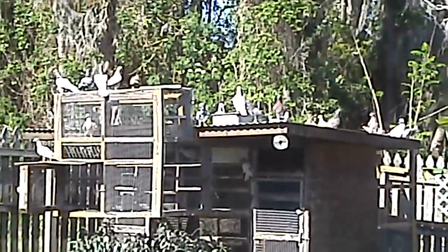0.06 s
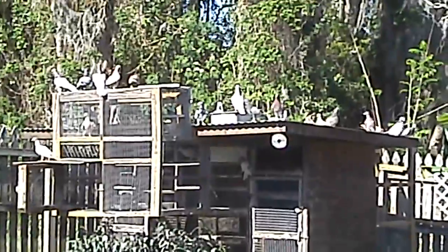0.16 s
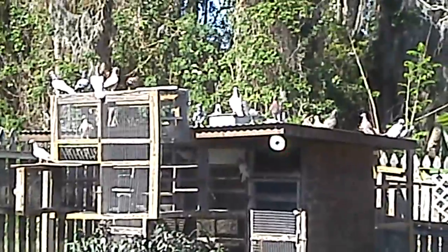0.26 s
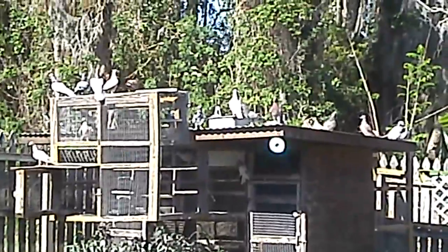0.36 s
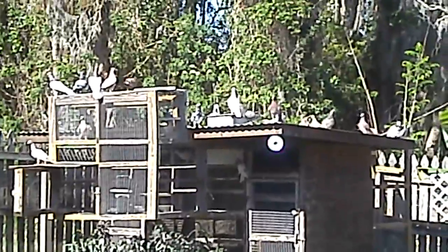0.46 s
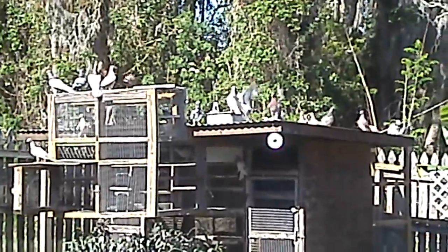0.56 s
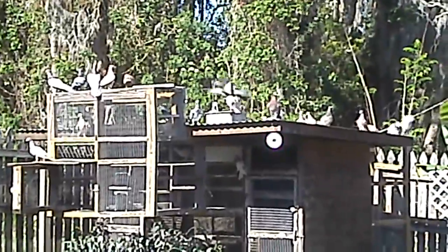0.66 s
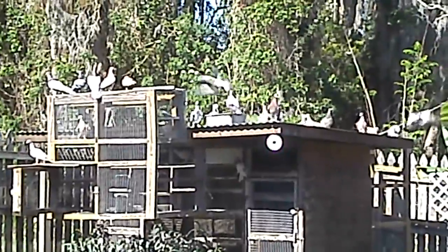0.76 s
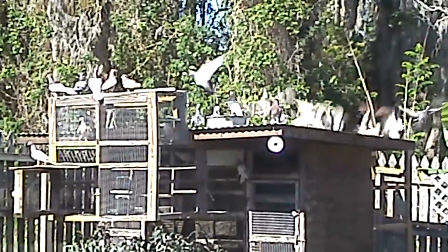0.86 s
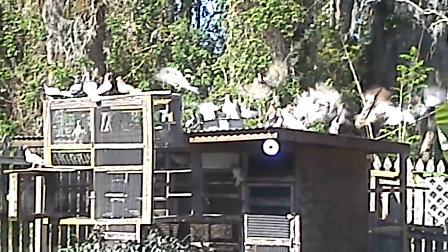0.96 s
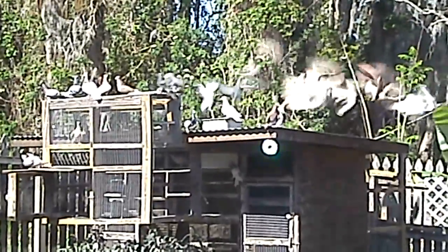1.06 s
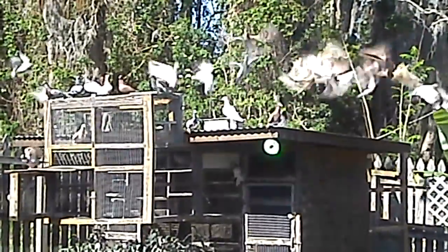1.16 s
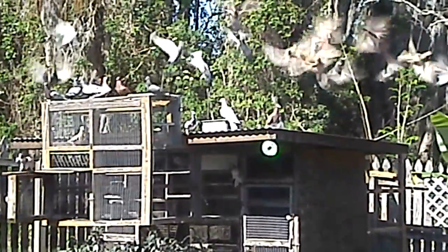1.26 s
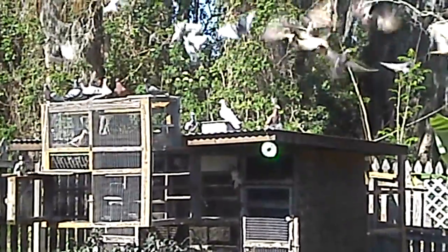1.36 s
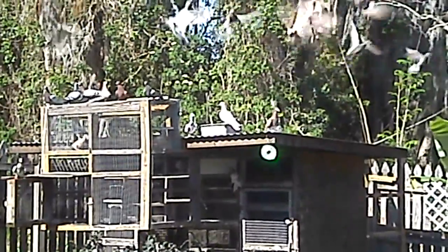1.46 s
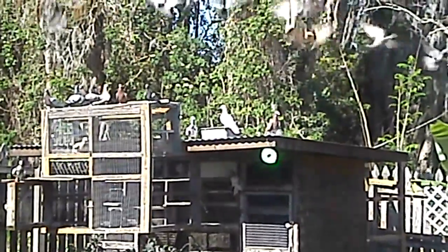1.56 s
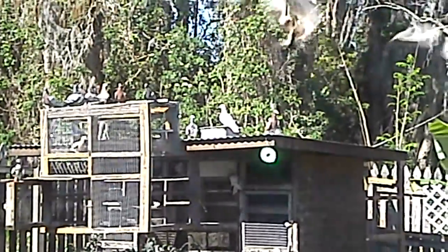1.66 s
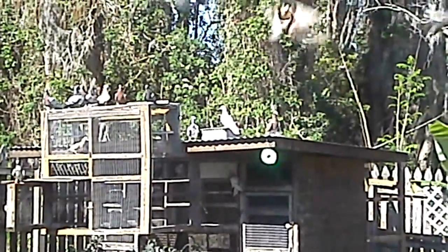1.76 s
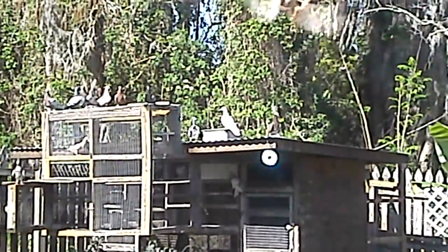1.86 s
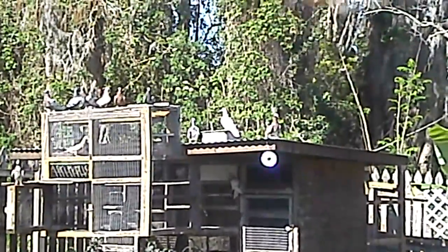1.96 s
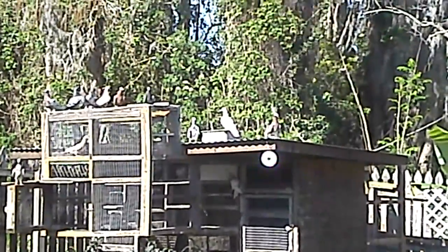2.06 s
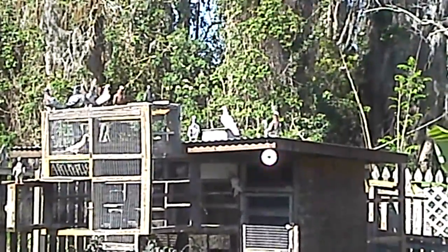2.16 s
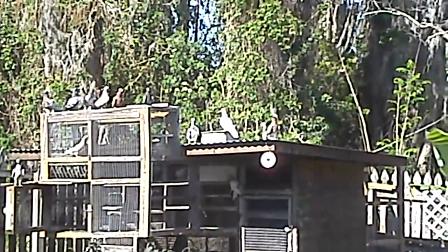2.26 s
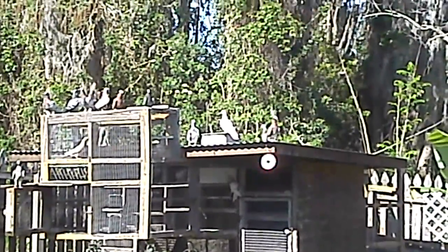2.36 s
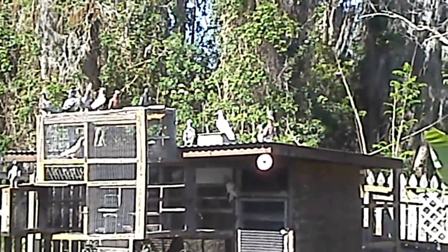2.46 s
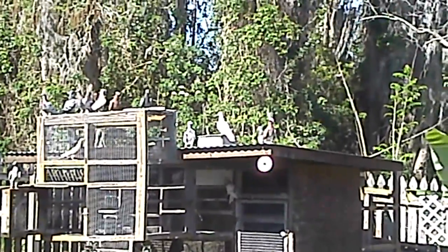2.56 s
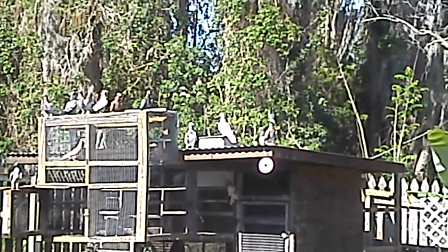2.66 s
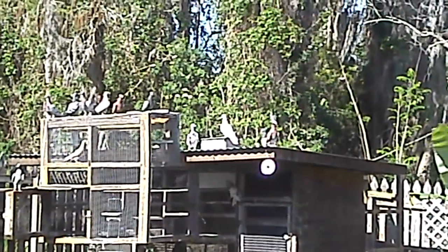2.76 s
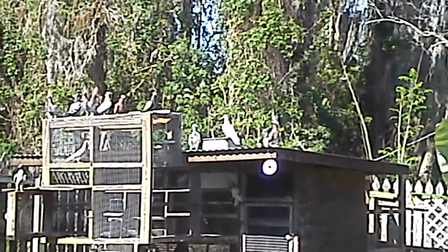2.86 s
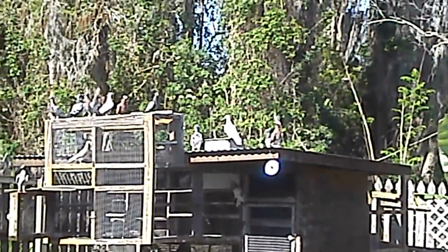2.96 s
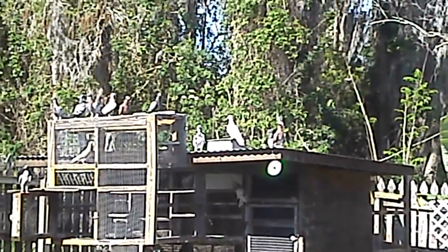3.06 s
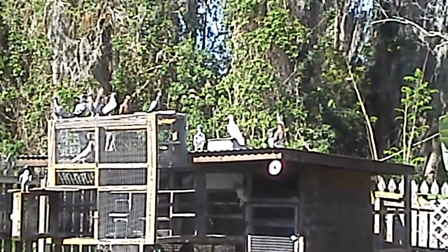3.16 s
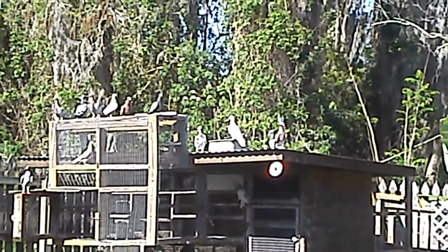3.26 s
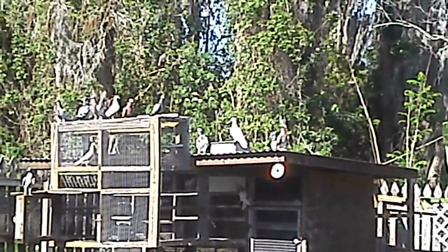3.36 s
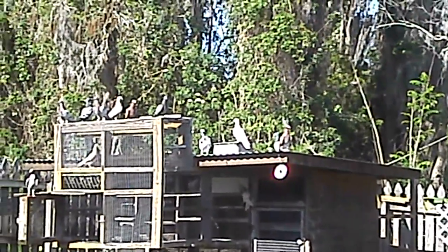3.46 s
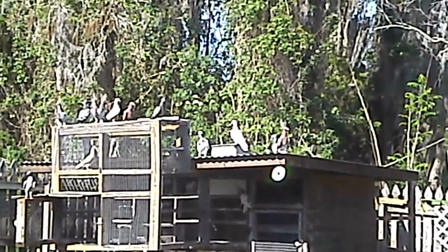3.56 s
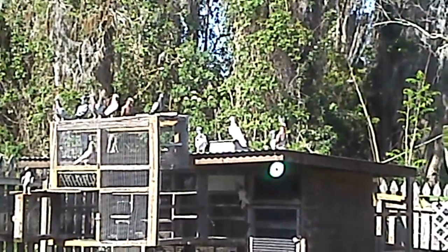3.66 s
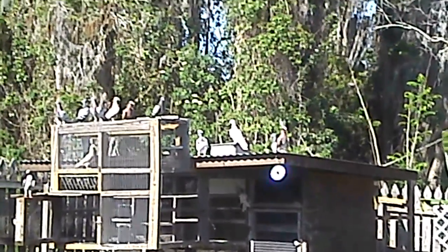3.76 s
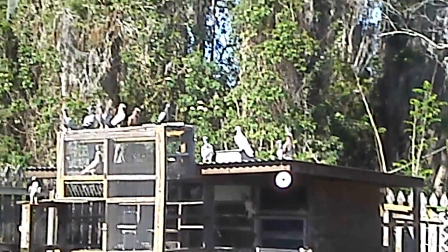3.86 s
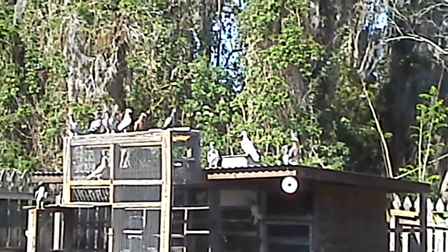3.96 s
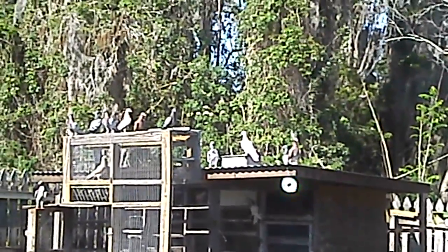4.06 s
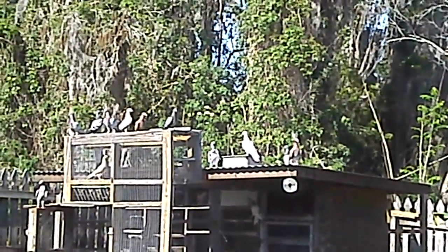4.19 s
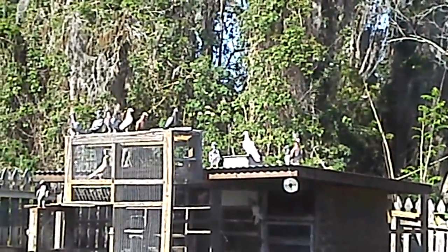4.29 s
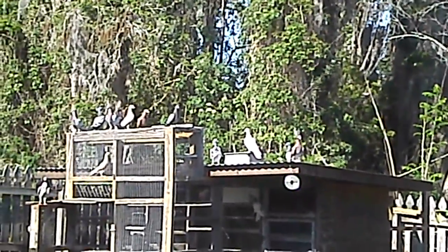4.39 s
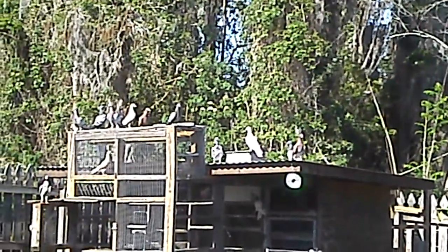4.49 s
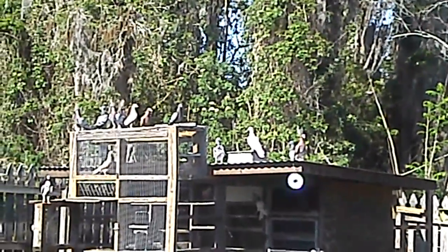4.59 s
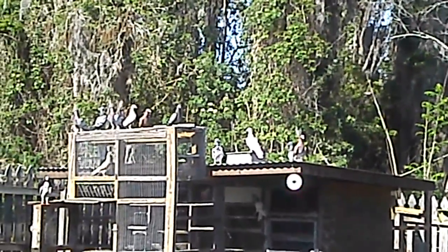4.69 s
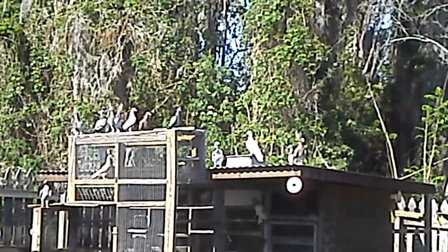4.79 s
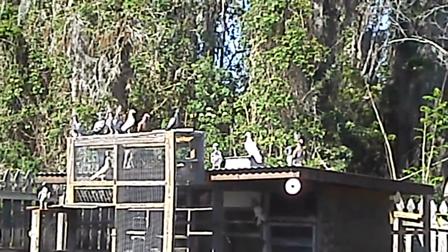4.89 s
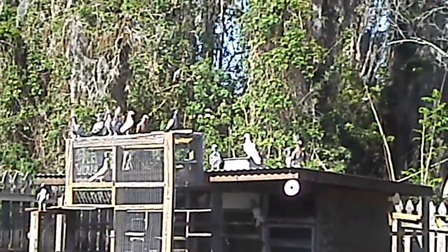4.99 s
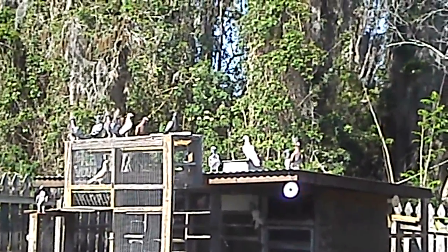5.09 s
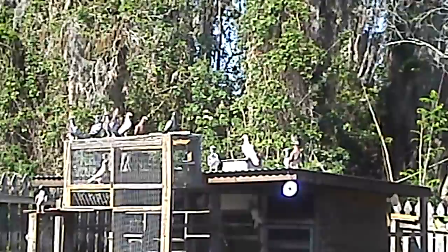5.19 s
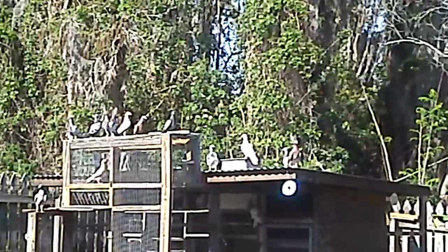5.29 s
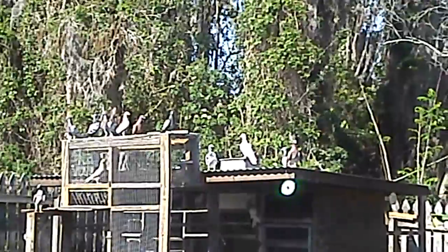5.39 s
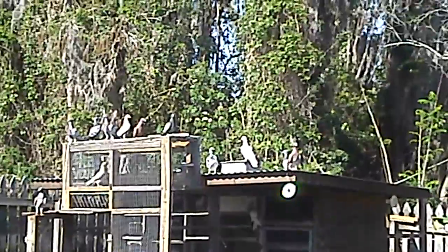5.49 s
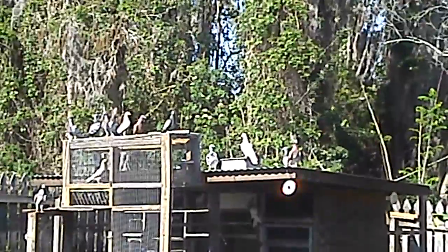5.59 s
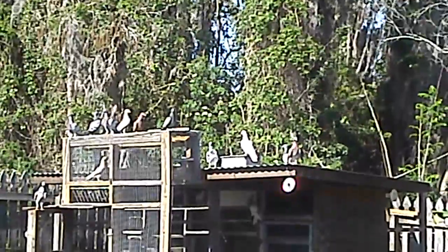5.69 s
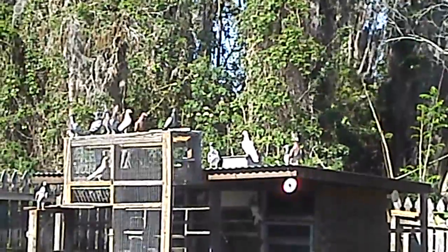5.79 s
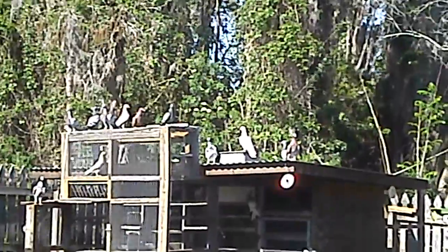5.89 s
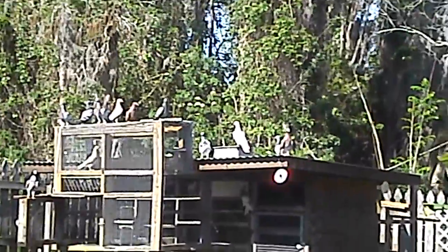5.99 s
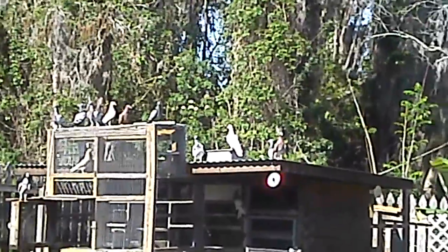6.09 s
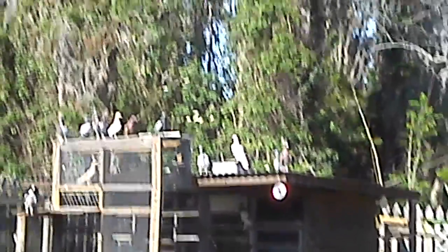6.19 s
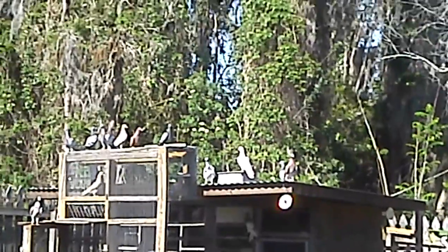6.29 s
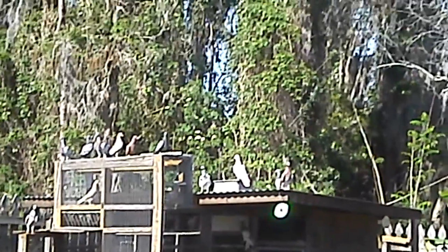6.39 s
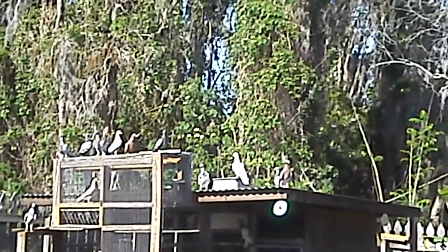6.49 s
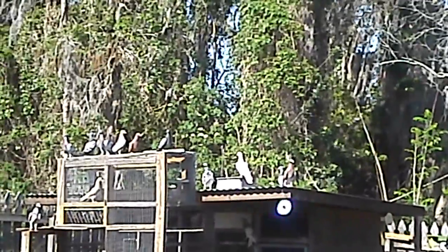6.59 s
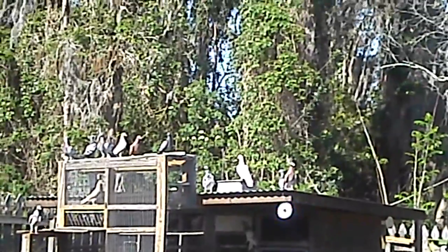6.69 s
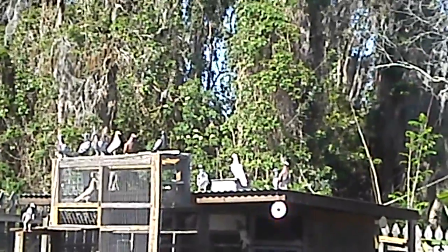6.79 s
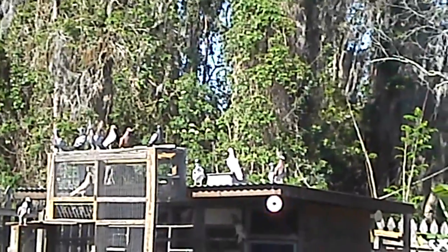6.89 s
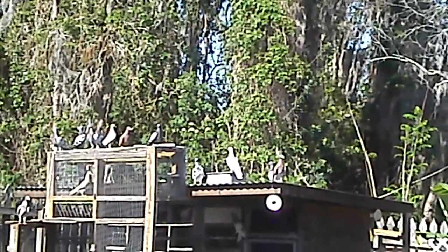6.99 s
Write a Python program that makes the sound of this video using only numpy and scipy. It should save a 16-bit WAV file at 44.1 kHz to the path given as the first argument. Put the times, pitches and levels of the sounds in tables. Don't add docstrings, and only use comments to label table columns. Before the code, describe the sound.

Pigeons explode into flight with dense, feathery flapping and sharp claps that swell, peak and stop, then faint whistling wingbeats over leaves and a distant engine.

```python
import sys
import numpy as np
from scipy import signal
from scipy.fft import rfft, irfft
from scipy.io import wavfile
from scipy.ndimage import uniform_filter1d

SR = 44100
rng = np.random.default_rng(int(sys.argv[2]) if len(sys.argv) > 2 else 0)


def elevation(decibels):
    levels = np.asarray(decibels, float)
    return 10 ** (levels / 20)


def unload_wav(signal):
    wavfile.write(
        sys.argv[1],
        SR,
        np.round(np.clip(np.atleast_2d(signal).T, -1, 1) * 32767).astype(np.int16),
    )


N = 310464


def over_time(points_s, values):
    return np.interp(np.arange(N) / SR, points_s, values)


def in_time(rows):
    s, *columns = np.transpose(rows)
    return [over_time(s, column) for column in columns]


def rms_one(x):
    return x / np.sqrt(np.mean(x ** 2) + 1e-20)


def band(x, low_hz, high_hz):
    return signal.sosfilt(signal.butter(2, [low_hz, high_hz], "band", fs=SR, output="sos"), x)


def coloured(spectrum, x):
    hz, db = np.transpose(spectrum)
    bin_hz = np.fft.rfftfreq(N, 1 / SR) + 1
    gain_db = np.interp(np.log(bin_hz), np.log(hz), db)
    return rms_one(irfft(rfft(x) * elevation(gain_db), N))


def drift(rate_hz):
    r = np.exp(-2 * np.pi * rate_hz / SR)
    wander = signal.lfilter([1], [1, -2 * r, r * r], rng.standard_normal(N + SR))
    return rms_one(wander[SR:])


def add(out, piece, start_s):
    at = max(round(start_s * SR), 0)
    out[at:at + len(piece)] += piece[:N - at]


# frequency in Hz, density in dB per Hz.
AIR_SPECTRUM = [(30, -5.5), (110, -3), (200, -8.5), (400, -2), (800, -5), (1300, -8.5), (2500, -11.5),
                (5000, -18)]
# middle in seconds, level in dB, half length in seconds.
GUSTS = [
    (0.0, -43.5, 0.26),
    (3.821, -46.5, 0.36),
]


def garden(rest_db=-47.5, stirred_db=-45, rustle_db=-3.0):
    t = np.arange(N) / SR
    rustle = elevation(rest_db) + elevation(stirred_db) * over_time([1.06, 1.12, 3.33, 3.42], [0, 1, 1, 0])
    for s, db, half_s in GUSTS:
        rustle = rustle + elevation(db) * np.clip(1 - np.abs(t - s) / half_s, 0, 1)
    return rustle * elevation(rustle_db + 2.2 * drift(9.5)) * coloured(AIR_SPECTRUM, rng.standard_normal(N))


# time in seconds, cycle rate in Hz, level in dB.
ENGINE_RUN = [(0.0, 28.1, -62.5), (0.45, 28.09, -62.5), (0.65, 28.3, -70), (0.92, 28.64, -56.5),
              (1.51, 30.21, -59.5), (2.21, 31.46, -52), (3.18, 32.85, -57.5), (3.92, 33.25, -59),
              (5.22, 33.6, -59.5), (5.94, 31.69, -66), (7.04, 30.13, -67.5)]
# multiple of the cycle rate, level in dB.
ENGINE_ORDERS = [(5, -2.5), (6, -5), (7, -8), (8, -1.5)]


def engine(waver=.002, throb_db=2.5, pipe_hz=318.2, pipe_width_hz=48):
    rate_hz, load_db = in_time(ENGINE_RUN)
    phase = 2 * np.pi * np.cumsum(rate_hz * (1 + waver * drift(3))) / SR
    levels = {round(k): elevation(load_db + db) for k, db in ENGINE_ORDERS}
    for k in (9, 10, 11):
        detune = 2 * (k * rate_hz - pipe_hz) / pipe_width_hz
        levels[k] = elevation(load_db + 3.0) / (1 + detune ** 2)
    out = np.zeros(N)
    for k, gain in levels.items():
        out += np.sqrt(2) * gain * elevation(throb_db * drift(3.6)) * np.sin(k * phase + k * k)
    return out


# middle in seconds, level in dB, pitch in Hz, length in ms.
COO_PUFFS = [(.01, -31, 372, 21), (0.034, -29.5, 477, 20), (0.061, -28, 346, 24), (0.083, -36, 432, 33),
             (0.116, -25.5, 395, 24), (.137, -36.5, 388, 18), (0.158, -26, 401, 26), (.182, -24.5, 360, 26),
             (0.2, -32, 367, 16), (0.221, -34, 413.4, 24), (3.64, -35.5, 416, 26), (4.6, -41, 307, 40),
             (4.867, -38, 324, 30), (4.985, -45, 312.4, 26), (5.015, -40, 301.5, 30),
             (5.108, -46.5, 286, 24), (5.135, -38, 286, 30), (5.201, -42.5, 297, 34),
             (5.41, -42.5, 305.7, 60), (6.235, -50, 294, 50)]
# time in seconds, pitch in Hz, level in dB.
HELD_COO = [
    (0.28, 437, -40.5),
    (0.312, 357, -39),
    (0.418, 372.4, -35),
    (0.44, 362, -27),
    (0.456, 330, -36.5),
    (0.488, 321, -41.5),
    (0.53, 319, -53),
]


def coo(second_db=-23.5, throb_db=5.5, breath_db=-9.5, hiss_db=-17.5):
    pitch_hz, db = in_time(HELD_COO)
    gate = over_time([.27, .29, .51, .54], [0, 1, 1, 0])
    effort = elevation(db + 1.0 + throb_db * drift(50)) * gate
    phase = 2 * np.pi * np.cumsum(pitch_hz * (1 + 0.017 * drift(40))) / SR
    voice = effort * (np.sin(phase) + elevation(second_db) * np.sin(2 * phase))
    for s, puff_db, hz, ms in COO_PUFFS:
        t = np.arange(round(ms / 1000 * SR)) / SR
        puff = elevation(puff_db) * np.hanning(len(t))
        add(voice, puff * np.sin(2 * np.pi * hz * t), s - ms / 2000)
        add(effort, puff, s - ms / 2000)
    breath = elevation(breath_db) * rms_one(band(rng.standard_normal(N), 300, 1100))
    hiss = elevation(hiss_db) * rms_one(band(rng.standard_normal(N), 2700, 3800))
    return voice + uniform_filter1d(effort, size=1500, origin=500) * (breath + hiss)


# start in seconds, peak in dB, strongest pitch in Hz, contact in ms.
FLOCK_CLAPS = [(0.887, -26.5, 684, 17), (0.967, -10.5, 3140, 14), (1.009, -19, 1390, 8.9),
               (1.062, -9.5, 670, 8.1), (1.095, -13, 2740, 22), (1.133, -16.5, 674, 54),
               (1.331, -12.5, 1283, 7), (1.425, -13.5, 1255, 10), (1.545, -14.5, 1325, 1.8),
               (1.571, -5.5, 3420, 11), (1.626, -4.5, 3210, 4.8), (1.653, -12, 3340, 11),
               (1.697, -3.5, 1327, 7.5), (1.744, -9.5, 1175, 5.6), (1.786, -14.5, 1850, 7),
               (1.813, 0.5, 2960, 3.7), (1.858, -12, 2865, 15), (1.893, -2.5, 3500, 2.9),
               (1.919, -1, 3220, 16), (1.955, -7.5, 1410, 30), (2.045, -5.5, 1130, 5.3),
               (2.058, -9, 3750, 6.4), (2.106, -6.5, 1344, 4.1), (2.138, -7, 1117, 8.1),
               (2.163, -12.5, 1200, 19), (2.191, -8, 1253, 9.5), (2.22, -4.5, 3450, 11),
               (2.253, -1, 2620, 8), (2.268, -3.5, 2730, 3.9), (2.303, -7.5, 3540, 3)]
# start in seconds, peak in dB, strongest pitch in Hz, contact in ms.
LATE_CLAPS = [(0.518, -32, 1940, 2.3), (2.355, -2, 3420, 5.5), (2.385, -5, 1990, 8.6),
              (2.406, -2, 1372, 1.9), (2.435, -8, 1440, 2.1), (2.479, -1.5, 1650, 12),
              (2.499, -6, 2430, 6.1), (2.602, -6.5, 3480, 4.6), (2.619, 0.5, 3360, 5.8),
              (2.651, -18, 930, 1.9), (2.721, 0.5, 1387, 12), (2.744, -0.5, 3160, 4.3),
              (2.831, -5.5, 2590, 7.6), (2.942, -1.5, 2820, 4.9), (3.045, 5, 1830, 4.5),
              (3.061, -6, 2410, 0.98), (3.159, 2, 836, 2.88), (3.28, -2.5, 834, 0.8), (3.295, -24, 3000, 3),
              (3.315, -19.5, 3330, 4.8), (3.625, -30.5, 2030, 4), (3.867, -29, 984, 7.9),
              (4.654, -20.5, 1900, 5.9), (0.979, -16.5, 870, 3.2), (1.308, -12, 1210, 7.9),
              (1.772, -6, 3090, 4.8), (2.028, -7, 1360, 6.3), (2.091, -14, 887, 3.1),
              (2.227, -5, 1316, 9.3), (2.548, -17.5, 807, 8.8)]


def claps(ring_width=0.2, attack_s=.0006, tail_ms=4.23, rough_db=3.5, level_db=1.0,
          dull_db=-16 + 7.5, dull_spread_db=5.5, body_db=-2.0):
    out, t = np.zeros(N), np.arange(2048) / SR
    rows = FLOCK_CLAPS + LATE_CLAPS
    for (s, db, hz, ms), noise in zip(rows, rng.standard_normal((len(rows), 4, 2048))):
        after_contact_s = np.maximum(t - ms / 1000, 0)
        shape = np.minimum(t / attack_s, 1) * np.exp(-after_contact_s / (tail_ms / 1000) - t / 0.014)
        jagged = shape * elevation(rough_db * rms_one(band(noise[3], 170, 830)))
        bright = rms_one(band(noise[0], 1800, 4900))
        dull = elevation(dull_db + dull_spread_db * noise[3, 0]) * rms_one(band(noise[1], 680, 1600))
        low_hz, high_hz = hz * (1 - ring_width / 2), hz * (1 + ring_width / 2)
        cupped = elevation(body_db) * rms_one(band(noise[2], low_hz, high_hz))
        burst = band(jagged * (bright + dull + cupped), 350, 5400)
        add(out, elevation(db + level_db) * burst / np.abs(burst).max(), s)
    return out


def after_claps(decay_s=0.032):
    out, t = np.zeros(N), np.arange(round(8 * decay_s * SR)) / SR
    for s, db, *_ in FLOCK_CLAPS + LATE_CLAPS:
        add(out, elevation(.5 * db) * np.exp(-t / decay_s), s)
    return np.tanh(uniform_filter1d(out, size=200))


# time in seconds, rush in dB.
FLOCK_EFFORT = [
    (0.82, -54),
    (0.91, -39.5),
    (1.0, -25.5),
    (1.4, -28.5),
    (1.54, -30),
    (1.66, -24),
    (2.6, -28.5),
    (3.3, -38.5),
    (3.56, -58.5),
]
# frequency in Hz, density in dB per Hz.
FEATHER_SPECTRUM = [(120, -61.5), (200, -21.5), (237, -25), (337, -17), (849, -7), (1020, -2.5),
                    (1310, 2.5), (1670, -7.5), (3330, -6), (4500, -19.5), (5850, -36.5), (9900, -120)]
RUSH_BANDS_DB = [0, 1.5, -1]
RUSH_FOLLOWS = [0.64, 1, 0.97]
# lift in dB in the slow, deep first strokes.
HEAVY_DB = [2, -1, 0.5]
HEAVY_UNTIL_S = [1.4, 1.6]


def rush(flutter_db=2.0, beat_db=-1.0, slaps_per_s=410.0, slap_db=-5.0, slap_ms=0.91, parting_db=4, top_db=-27):
    hits = (rng.random(N) < slaps_per_s / SR) * rng.standard_normal(N)
    hits = hits * elevation(1.5 * rng.exponential(1, N).clip(0, 4))
    fading = np.exp(-np.arange(400) / SR * 1000 / slap_ms)
    slaps = rng.standard_normal(N) * signal.fftconvolve(np.abs(hits), fading)[:N]
    feathers = coloured(FEATHER_SPECTRUM, rng.standard_normal(N) + elevation(slap_db) * rms_one(slaps))
    together_db = beat_db * drift(26) + parting_db * (after_claps() - .5)
    effort_db, = in_time(FLOCK_EFFORT)
    heavy = over_time(HEAVY_UNTIL_S, [1, 0])
    edges_hz = [(250, 1000), (1000, 2200), (2200, 5400)]
    out = np.zeros(N)
    for db, lift_db, share, edge in zip(RUSH_BANDS_DB, HEAVY_DB, RUSH_FOLLOWS, edges_hz):
        level_db = top_db + db + lift_db * heavy + share * (effort_db - top_db)
        out += elevation(level_db + together_db + flutter_db * drift(85)) * rms_one(band(feathers, *edge))
    return out * over_time([.78, .84, 3.5, 3.57], [0, 1, 1, 0])


# middle in seconds, feather pitch in Hz, whistle in dB,
# loudest partial 1-3, air in dB.
FLOCK_STROKES = [(0.9, 659, -43.5, 1.9, -43.5), (0.995, 621, -35.5, 0.37, -28.5),
                 (1.075, 692, -35, 2.2, -35), (1.17, 670, -37, 2.4, -35), (1.24, 690, -40.5, 0.57, -33.5),
                 (1.282, 684, -30.5, 0.71, -35.5), (1.335, 659, -29.5, 1.6, -27),
                 (1.43, 613, -24.5, 1.55, -36), (1.475, 711, -30, 0.87, -35), (2.42, 681, -43, 1.3, -27.5),
                 (2.535, 818, -27, 0.52, -29), (2.655, 719, -33.5, 0.9, -30.5), (3.0, 752, -35.5, 1.2, -31),
                 (3.1, 750, -37.5, 1.6, -35.5), (3.2, 800, -32.5, 1.4, -36.5),
                 (3.315, 694, -36.5, 0.83, -32.5), (3.385, 656, -44.5, 1.4, -32),
                 (3.435, 693, -32.5, 1.47, -32)]
# middle in seconds, feather pitch in Hz, whistle in dB,
# loudest partial 1-3, air in dB.
LONE_STROKES = [(3.64, 664, -52.5, 2.8, -46), (3.685, 653.4, -52, 1.9, -42), (3.75, 672, -40, 1.05, -38),
                (3.9, 737, -55, 1.6, -44), (4.04, 717, -58, 1.1, -42.5), (4.115, 659, -56.5, 1.6, -53),
                (4.34, 670, -62, 1.1, -50), (4.475, 746, -50, 2.1, -56), (4.55, 640, -51, 1.9, -48.5),
                (4.6, 769, -49, 1, -41.5), (4.675, 783, -53.5, 1.1, -43), (4.855, 730, -44.5, 3.3, -42.5),
                (4.995, 717, -42, 2.5, -43), (5.12, 728, -44.5, 3, -42), (5.2, 647, -53.5, 1.7, -50),
                (5.25, 724, -49, 3.5, -51.5), (5.378, 747, -44.5, 1.4, -40), (5.49, 761, -47, 1, -45.5),
                (5.745, 713, -47.5, 1.1, -50.5), (5.885, 702, -47, 0.82, -43), (6.17, 661, -57, 2.5, -53),
                (6.695, 637, -51.5, 2.8, -45.5), (6.825, 641, -52.5, 1.8, -49.5),
                (6.93, 683, -40, 1.6, -38)]
PARTIAL_FLOOR_DB = [-15, -17, -9.5]


def whistles(length_ms=72., rise=.13, waver=0.0062, gain_db=2.5, partial_fall_db=12.5, flutter_db=2.5):
    out, wobble = np.zeros(N), drift(60)
    t = np.arange(round(length_ms / 1000 * SR)) / SR
    for s, hz, db, loudest, _ in FLOCK_STROKES + LONE_STROKES:
        start_s = s - length_ms / 2000
        shake = np.resize(wobble[round(start_s * SR):], len(t))
        pitch_hz = hz * (1 + rise * (t / t[-1] - .5) + waver * shake)
        phase = 2 * np.pi * np.cumsum(pitch_hz) / SR
        loss_db = np.maximum(-partial_fall_db * (np.arange(1, 4) - loudest) ** 2, PARTIAL_FLOOR_DB)
        tone = sum(elevation(db + loss + gain_db) * np.sin(k * phase) for k, loss in enumerate(loss_db, 1))
        add(out, tone * np.hanning(len(t)), start_s)
    return out * elevation(flutter_db * drift(50))


def puffs(length_ms=75., lag_s=.008, rough_db=-0.5):
    swell, shape = np.zeros(N), np.hanning(round(length_ms / 1000 * SR))
    for s, *_, db in FLOCK_STROKES + LONE_STROKES:
        add(swell, elevation(db) * shape, s + lag_s - length_ms / 2000)
    air = coloured(AIR_SPECTRUM, band(rng.standard_normal(N), 250, 5000))
    return swell * elevation(rough_db * drift(210)) * air


# delay in seconds, level in dB.
ECHOES = [(.008, -14), (0.0143, -22), (0.027, -18), (0.04, -19), (.062, -19.5), (0.087, -25.5)]


def yard(x, dull_hz=3000., smear_ms=6.):
    t = np.arange(round(.15 * SR)) / SR
    spots = sum(elevation(db) * np.exp(-np.abs(t - s) * 1000 / smear_ms) * (t > s) for s, db in ECHOES)
    response = spots * rng.standard_normal(len(t)) / np.sqrt(smear_ms / 2000 * SR)
    return x + signal.fftconvolve(band(x, 200, dull_hz), response)[:N]


def scene():
    birds = coo() + claps() + whistles() + puffs()
    return (garden() + engine() + yard(birds) + rush())[None]


def low_pass(x):
    return signal.sosfilt(signal.butter(12, 15760, fs=SR, output="sos"), x)


def record(dry, step=.00765, bias=-.0046, overload=.975):
    dry = dry - 0.24 * band(dry, 440, 620) - .25 * band(dry, 3800, 4500)
    dry = dry + 0.097 * band(np.clip(dry, -1.5, 1.5) ** 4, 27.0, 300)
    slow = signal.resample_poly(dry, 1, 4, axis=1)
    steps = np.clip(np.round((slow + bias) / step), -128, 127) * step
    smooth = signal.firwin(numtaps=97, cutoff=4180, window=("kaiser", 9.), fs=SR)
    full = signal.resample_poly(steps, 4, 1, axis=1, window=smooth)[:, :N]
    mix = np.clip(full, -overload, overload)
    return low_pass(mix)


dry = scene()
out = record(dry)
unload_wav(out)
```